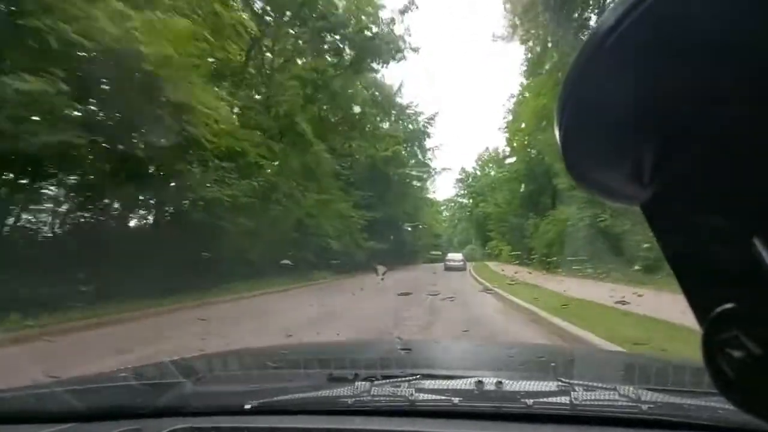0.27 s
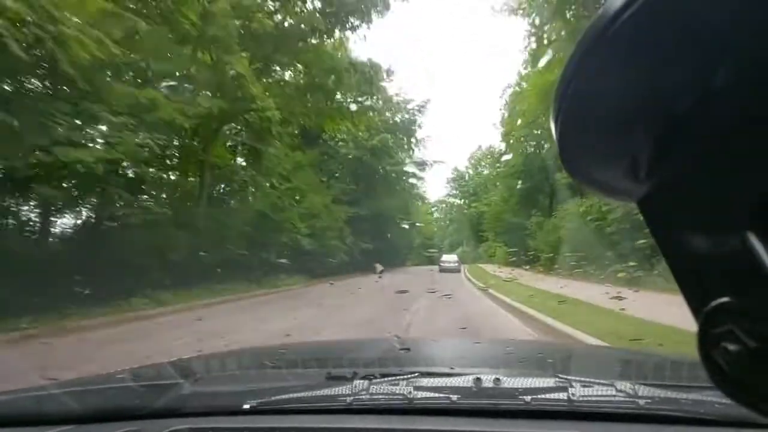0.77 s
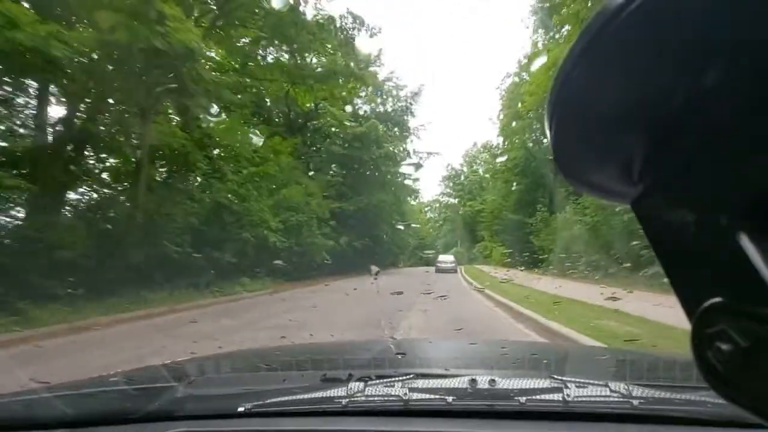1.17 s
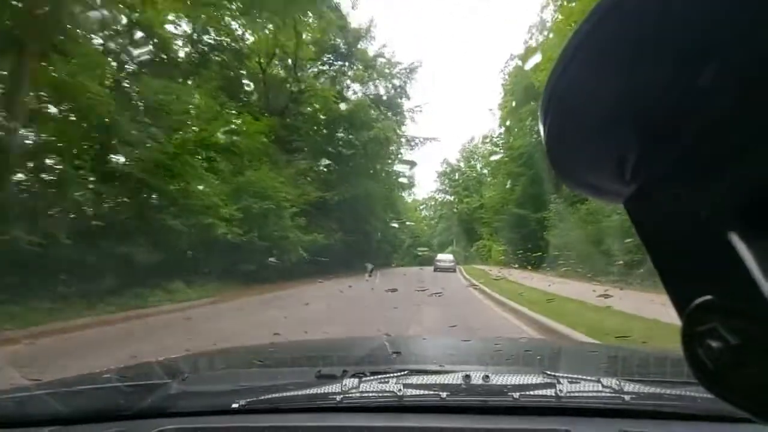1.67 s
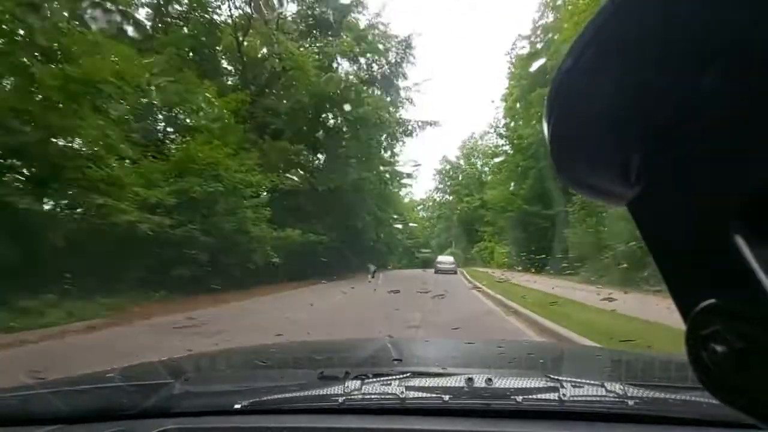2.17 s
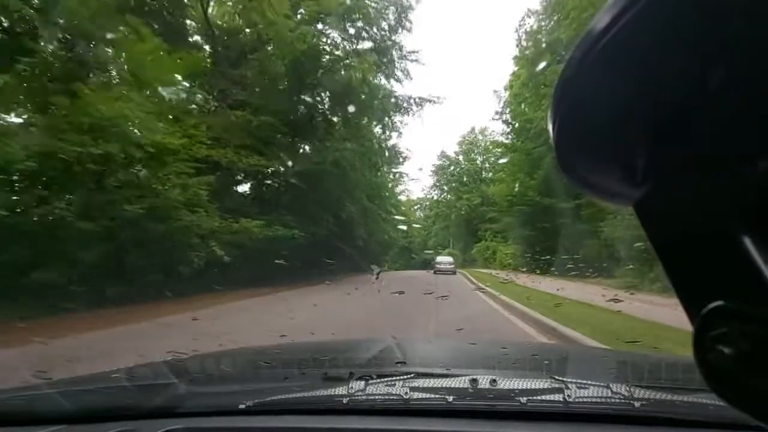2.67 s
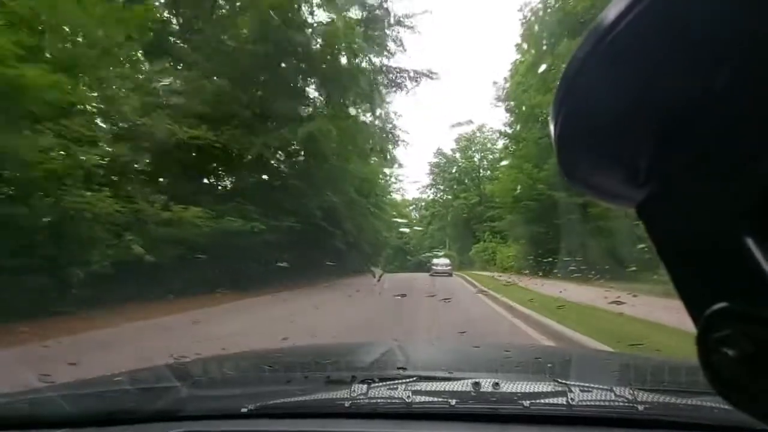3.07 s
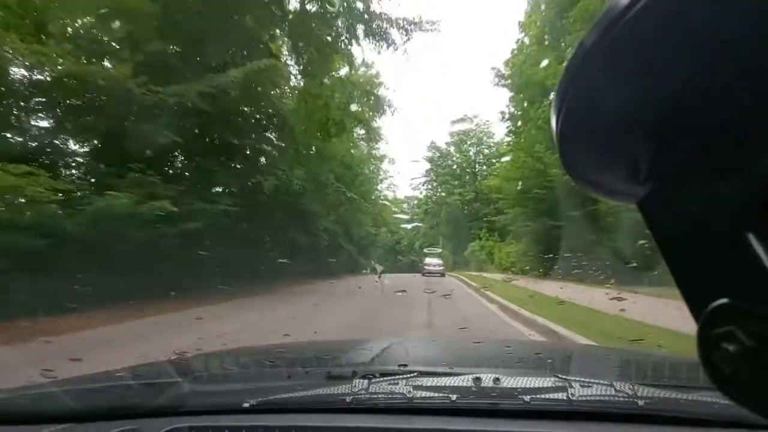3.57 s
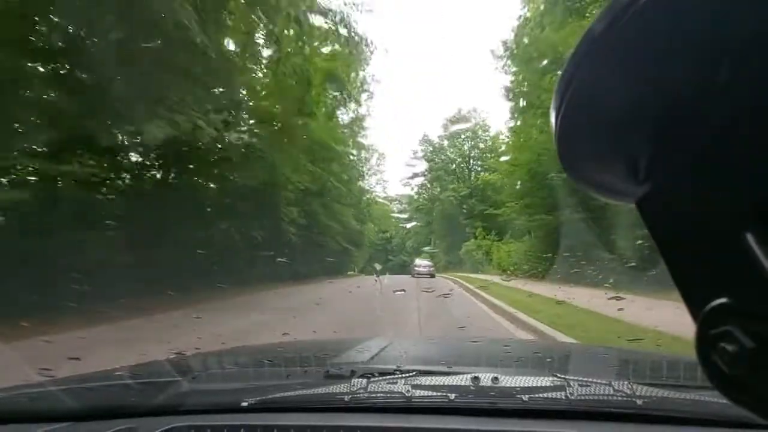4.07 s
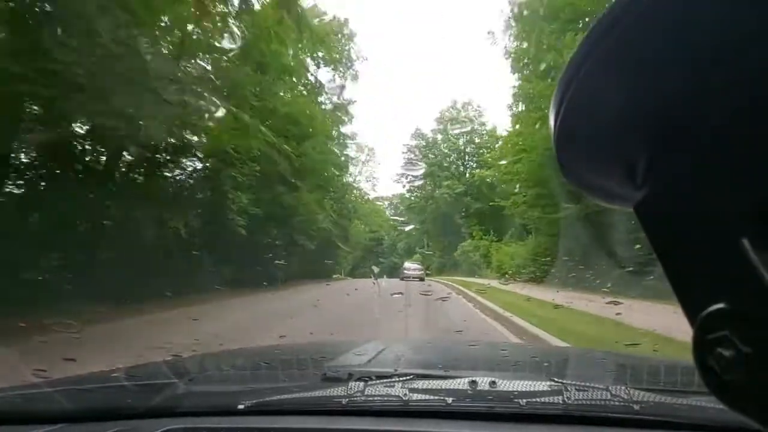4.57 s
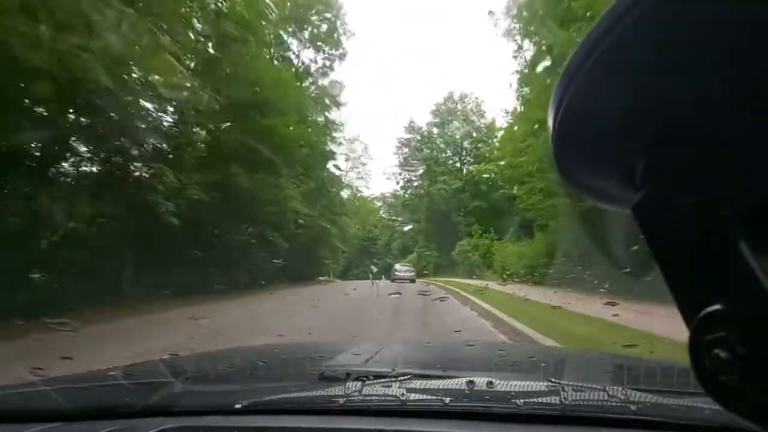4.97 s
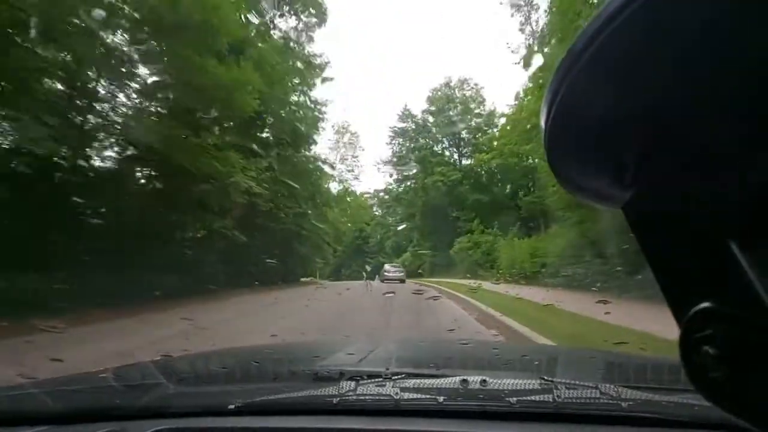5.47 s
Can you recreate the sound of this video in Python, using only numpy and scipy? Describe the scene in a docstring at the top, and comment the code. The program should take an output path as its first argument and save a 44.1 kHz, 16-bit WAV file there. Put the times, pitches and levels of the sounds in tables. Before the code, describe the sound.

Inside a car on a damp road, a low six-cylinder engine and exhaust drone dominates throughout, nearly constant in pitch. It starts strong, eases off from about 0.5 to 1.7 seconds, then pulls again at 2 seconds with a slight growl, holding until it softens a little after 5 seconds. Tyres rumble underneath with a faint wet hiss. Bumps thud through the body around 0.9 and 1.5 seconds, harder at 3 and 3.3 seconds, and again at 5.4, with short knocks from the trim. A loose plastic part buzzes quietly in bursts near the start, mostly between 1.7 and 3.4 seconds, and again after 5. Tiny metal chinks come around 0.5, 1.3, 1.8 and 5.2 seconds. Sparse raindrops tick on the windscreen, slightly to the left, growing more frequent from 3 seconds. Everything sounds close and enclosed.

```python
"""Inside a sports car on a damp road. The V6 exhaust drones near 1800 rpm, eases off and pulls again;
its note is made of the engine's firing pulses. The tyres rumble and hiss, and sparse raindrops tick
on the windscreen. A loose plastic part buzzes in bursts, small metal fittings chink, and bumps thud
through the body and knock the trim. All but the engine is noise, shaped in tone and loudness."""
import sys
import numpy as np
from scipy import signal
from scipy.fft import rfft, irfft, next_fast_len
from scipy.io import wavfile
from scipy.ndimage import map_coordinates

SR = 44100
rng = np.random.default_rng(int(sys.argv[2]) if len(sys.argv) > 2 else 0)


def write(x):
    x = np.atleast_2d(x).T
    wavfile.write(sys.argv[1], SR, np.round(np.clip(x, -1, 1) * 32767).astype(np.int16))


N = 252336

# How alike left and right sound. Each row: pitch in Hz, likeness (1 is the same, 0 is unrelated).
LIKENESS = [(60, .99), (160, .95), (290, .75), (480, .45), (700, 0), (1300, -.2), (2500, .1), (12000, .1)]
# Bumps under the wheels. Each row: start in seconds, suspension heave in dB, body thud in dB.
ROAD_BUMPS = [(.565, -19, -51.5), (.857, -22.5, -41.5), (1.2, -33, -56), (1.55, -22.5, -46.5),
              (1.71, -26.5, -55.5), (2.2, -21.5, -58), (2.83, -16, -57.5), (2.971, -13, -42.5),
              (3.31, -20, -34.5), (5.1, -18.5, -55.5), (5.42, -25.5, -37)]
CABIN_PHASE = 1.3  # radians by which the cabin shifts the firing overtones against the boom


def amp(db):
    """Turn decibels into a number to multiply by."""
    return 10 ** (np.asarray(db) / 20)


def unit(x):
    """Scale a signal to an average (rms) level of 1."""
    return x / np.sqrt(np.mean(x ** 2) + 1e-20)


def along(points, hz):
    """Read between rows of (Hz, value), with octaves evenly spaced."""
    row_hz, values = np.transpose(points)
    return np.interp(np.log(hz + 1), np.log(row_hz + 1), values)


def curves(rows):
    """Give one value per sample for each column after the time."""
    times, *columns = np.transpose(rows)
    return [np.interp(np.arange(N) / SR, times, column) for column in columns]


def wobble(rate):
    """A smooth curve through `rate` random points a second."""
    coarse = np.arange(0, N + 64, 64)
    points = rng.standard_normal(1024)
    return np.interp(np.arange(N), coarse, map_coordinates(points, [coarse * rate / SR], mode="wrap"))


def filtered(x, response):
    """Scale each frequency in x by response(hz)."""
    size = next_fast_len(N + SR // 4)
    return irfft(rfft(x, size) * response(np.fft.rfftfreq(size, 1 / SR)), size)[..., :N]


def cabin_noise(response):
    """Filtered stereo noise at level 1: the bass is in the middle, the treble all around."""
    def weights(hz):
        angle = np.arccos(np.clip(along(LIKENESS, hz), -1, 1)) / 2
        return response(hz) * np.array([np.cos(angle), np.sin(angle)])
    mid, side = filtered(rng.standard_normal((2, N)), weights)
    return unit(np.array([mid + side, mid - side]))


def rush(tone):
    """Cabin noise shaped by rows of (Hz, dB)."""
    return cabin_noise(lambda hz: amp(along(tone, hz)))


def strikes(times, db, attack, t60, tail_db, tail_t60):
    """Loudness of blows: a quick rise, a fall and a weak cabin tail. t60 is seconds to fade 60 dB."""
    t = np.arange(SR // 5) / SR
    fall = amp(-120 * t / t60) + amp(2 * tail_db - 120 * t / tail_t60)  # power, so the dB are doubled
    shape = (1 - np.exp(-t / attack)) ** 2 * fall
    starts = np.clip(np.round(times * SR).astype(int), 0, N - 1)
    power = np.bincount(starts, amp(db) ** 2, N)
    return np.sqrt(np.abs(signal.fftconvolve(power, shape / shape.max())[:N]))


def placed(phase, pan_db, lead):
    """A tone at two spots in the cabin: the left is pan_db louder and `lead` radians ahead."""
    left = amp(pan_db / 2) * np.cos(phase + lead / 2)
    right = amp(-pan_db / 2) * np.cos(phase - lead / 2)
    return np.sqrt(2) * np.array([left, right])


def engine():
    """Six firings a cycle make a boom, with a drone, growl and snarl at 2, 3 and 4 times its pitch."""
    # Engine speed. Each row: time in seconds, firings per second.
    speed = [(0, 94), (.3, 88.6), (.75, 87.5), (1.1, 84), (1.7, 83.2), (2.0, 86.8), (3.0, 88.4),
             (4.0, 89.9), (4.35, 91.3), (4.8, 92.1), (5.25, 91.3), (5.72, 88.7)]
    # Loudness of the boom (set by the throttle), growl and snarl. Each row: time in seconds, level in dB.
    throttle = [(0.04, -10), (0.5, -16), (0.56, -21), (1.27, -27), (1.74, -23), (1.84, -19), (2.06, -14),
                (2.4, -13), (3.16, -15), (4.44, -12), (5.7, -18)]
    growl = [(.24, -47.5), (.42, -36), (1.55, -36.5), (2.03, -24.5), (3.1, -27), (4.1, -29.5), (5.0, -35.5),
             (5.7, -35.5)]
    snarl = [(0, -38), (.17, -39.5), (.8, -54.5), (1.75, -49), (2.2, -39), (3.5, -42.5), (4.4, -51.5),
             (5.0, -60), (5.6, -52.5)]
    # The drone. Each row: time in seconds, level in dB compared with the boom.
    drone = [(.1, -8), (.45, -7), (1.1, -1.5), (2.1, -3), (4.3, -4.5), (5.7, -5)]
    firing_hz, = curves(speed)
    boom_db, = curves(throttle)
    growl_db, = curves(growl)
    snarl_db, = curves(snarl)
    drone_db = boom_db + curves(drone)[0]
    firing = 2 * np.pi * np.cumsum(firing_hz) / SR + .02 * wobble(25)
    cycle = firing / 6
    throb = np.cos(cycle)  # unequal cylinders swell the note once a cycle
    growl_db = growl_db + .42 * throb + .17 * wobble(30)
    out = amp(boom_db) * placed(firing, pan_db=.75, lead=.08)
    out += amp(drone_db + 1.4 * throb) * placed(2 * firing + CABIN_PHASE, pan_db=1.9, lead=.24)
    out += amp(growl_db) * placed(3 * firing + CABIN_PHASE, pan_db=-3.5, lead=-.18)
    out += amp(snarl_db + .95 * wobble(13)) * placed(4 * firing + CABIN_PHASE, pan_db=-1.5, lead=.37)
    load_db = boom_db - boom_db.max()  # more throttle, stronger overtones
    return out + amp(.74 * load_db + 3.5) * exhaust_overtones(cycle, firing_hz / 6)


def exhaust_overtones(cycle, cycle_hz, bank_db=-6, cylinder_db=-11.5, rough_db=1.5, count=72):
    """Unequal cylinders and their two banks add weak tones that swell as they slide past resonances."""
    # Exhaust tone in the cabin. Each row: pitch in Hz, relative level in dB.
    pipe = [(40, -42), (100, -33), (133, -27), (200, -37), (300, -41), (350, -49), (400, -56), (440, -61),
            (560, -63), (640, -59), (760, -66), (1100, -76)]
    # Resonances of pipe and cabin. Each row: pitch in Hz, width in Hz, boost in dB.
    resonances = [(308, 22, 7), (352, 24, 10), (378, 14, 11), (416, 14, 11), (457, 30, 14), (523, 32, 13),
                  (611, 12, 5)]
    grid_hz = np.arange(1500)
    boost_db = sum(db / (1 + (2 * (grid_hz - hz) / width) ** 4) for hz, width, db in resonances)
    passed_db = along(pipe, grid_hz) + boost_db
    out = np.zeros((2, N))
    for k in range(2, count + 1):
        if k in (6, 12, 18, 24):  # engine() makes these four
            continue
        share_db = 0 if k % 6 == 0 else bank_db if k % 3 == 0 else cylinder_db
        hz = k * cycle_hz
        apart = np.sqrt(1 - np.clip(along(LIKENESS, hz.mean()), 0, 1))
        start, pan, lead = rng.standard_normal(3)
        level = amp(np.interp(hz, grid_hz, passed_db) + share_db + rough_db * wobble(13))
        shift = CABIN_PHASE if k % 6 == 0 else np.pi * start
        out += level * placed(k * cycle + shift, pan_db=2 * apart * pan, lead=1.7 * apart * np.sign(lead))
    return out


def road():
    """The suspension rumbles and heaves, body panels boom, and tyres roar and hiss on damp asphalt."""
    # Uneven road between bumps. Each row: time in seconds, rumble in dB.
    unevenness = [(.1, -27.5), (.45, -37), (.65, -29), (1.7, -25.5), (2.0, -32.5), (2.5, -28), (3.15, -36),
                  (3.6, -31), (4.9, -37.5), (5.6, -29.5)]
    # Rolling tyres. Each row: time in seconds, then relative levels of roar and hiss in dB.
    rolling = [(0.08, -54.5, -72), (0.59, -59.5, -73.5), (0.9, -61, -84.5), (1.27, -60.5, -79.5),
               (1.98, -56.5, -74), (2.17, -54.5, -74), (2.62, -57.5, -79), (3.19, -56.5, -72),
               (3.81, -57.5, -74.5), (4.94, -56.5, -77), (5.18, -57.5, -72), (5.64, -57.5, -77)]
    # The tone of each of the four noises. Each row: pitch in Hz, relative level in dB.
    rumble_tone = [(12, -32.5), (24, -14), (38, -9.5), (48, -6.5), (60, 5), (72, -9.5), (90, -9),
                   (200, -33.5), (500, -77.5)]
    body_tone = [(50, -31.5), (90, -7), (125, -0.5), (160, -4.5), (215, -5), (290, -8.5), (345, -11.5),
                 (400, -22.5), (560, -28.5), (900, -66)]
    roar_tone = [(200, -19.5), (450, -1), (760, 0.5), (1000, -9), (1300, -12), (2100, -17), (2800, -22.5),
                 (4000, -23.5), (6000, -37.5), (12000, -51.5)]
    hiss_tone = [(1000, -8.5), (3500, 2.5), (6500, -3.5), (11000, 0), (14000, -3), (16000, -8)]
    rumble_db, = curves(unevenness)
    roar_db, hiss_db = curves(rolling)
    times, heave_db, _ = np.transpose(ROAD_BUMPS)
    surface_db = .7 * wobble(20)
    heave = strikes(times, heave_db, attack=.02, t60=.31, tail_db=-22.5, tail_t60=.3)
    rumble = np.hypot(amp(rumble_db), heave) * rush(rumble_tone)
    body = amp(-30.5 + 1.4 * (roar_db - roar_db.mean()) + surface_db) * rush(body_tone)
    roar = amp(roar_db + 6 + surface_db) * rush(roar_tone)
    hiss = amp(hiss_db + 5.5) * rush(hiss_tone)
    return rumble + body + roar + hiss


def rain(tick_db=-7, splash_db=-2, size_range_db=13, small_splash_db=-12, count=170):
    """Single drops tick on the glass with a bright splash; smaller ones patter between them."""
    # The largest drops. Each row: start in seconds, relative level in dB, treble offset in dB.
    drops = [(0.1425, -38, -16.5), (.9583, -44, -29), (1.042, -45, -15), (1.4631, -42, -12),
             (2.0449, -37, -25), (2.1245, -39, -15), (2.9483, -38, -10), (3.2182, -37, -12),
             (3.5, -39, -17), (3.628, -41.5, -13), (3.7317, -41.5, -15), (3.7988, -36, -12),
             (3.8208, -38, -19), (4.1865, -39, -22.5), (4.3329, -36.5, -10), (4.5358, -42.5, -18.5),
             (4.6151, -46.5, -15.5), (4.7206, -38.5, -10.5), (4.8389, -43, -17), (4.9635, -40.5, -20.5),
             (5.0841, -44, -3), (5.4985, -42.5, -4.5)]
    # The patter grows louder. Each row: time in seconds, level of its bigger drops in dB.
    shower = [(0, -52), (2.4, -51), (3.3, -47.5), (5.7, -48.5)]
    # The tones of struck glass and splashing water. Each row: pitch in Hz, relative level in dB.
    glass_tone = [(800, -24), (1800, -2), (3200, -1), (4200, 0), (5500, -7), (8000, -11), (14000, -23)]
    splash_tone = [(2500, -25.5), (6000, -9), (11000, -3), (15000, -7)]
    times, db, treble_db = np.transpose(drops)
    tick = strikes(times, db + tick_db, attack=.0002, t60=.012, tail_db=-15, tail_t60=.09)
    splash = strikes(times, db + treble_db + splash_db, attack=.0002, t60=.008, tail_db=-18, tail_t60=.05)
    when, size = rng.random((count, 2)).T
    when = when * N / SR
    small_db = np.interp(when, *np.transpose(shower)) - size_range_db * (1 - size ** 2)  # mostly tiny
    patter = strikes(when, small_db, attack=.0002, t60=.011, tail_db=-20, tail_t60=.05)
    glass = np.hypot(tick, patter) * rush(glass_tone)
    water = np.hypot(splash, amp(small_splash_db) * patter) * rush(splash_tone)
    return (glass + water) * amp([[.6], [-.6]])  # a little to the left


def plastic_buzz(shake_s=.0405, contacts_per_s=4000, ring_db=-3.5, chatter_db=-12, chatter_grows=1.35):
    """A loose part shakes in bursts; each shake is a run of tiny contacts that make it ring."""
    # Bursts of shaking. Each row: start in seconds, length in seconds, relative level in dB.
    bursts = [(0.234, .06, -52), (0.423, .14, -50), (0.643, .02, -54), (1.299, .06, -56), (1.751, .06, -49),
              (2.021, .06, -47.5), (2.135, .1, -49.5), (2.244, .1, -42), (2.524, .06, -48.5),
              (2.846, .02, -49), (2.994, .06, -48.5), (3.214, .06, -47), (3.328, .02, -46.5),
              (5.095, .22, -51), (5.597, .1, -50)]
    # The part's resonances. Each row: pitch in Hz, width in Hz, relative level in dB.
    resonances = [(1740, 60, -8), (2055, 60, 0), (2245, 65, -2), (2400, 80, -9), (2590, 80, -8),
                  (3250, 110, -10), (4400, 1400, -19), (7000, 500, -20), (8880, 300, -11), (9710, 250, -11),
                  (11000, 700, -17), (12500, 1100, -15)]
    # The road keeps it trembling between bursts. Each row: time in seconds, level in dB.
    trembling = [(.3, -70.5), (3.3, -69.5), (3.6, -76), (4.9, -74.5), (5.2, -67)]
    shakes = [(start + lag, db - 1 if lag == 0 else db)  # a burst needs one shake to get going
              for start, length, db in bursts for lag in np.arange(0, length, shake_s)]
    times, db = np.transpose(shakes)
    db = db + 1.5 * rng.standard_normal(len(times))
    contacts = unit((rng.random(N) < contacts_per_s / SR) * rng.standard_normal((2, N)))

    def ring(loudness, modes):
        """The contacts follow a loudness curve and set some of the resonances ringing."""
        def response(f):
            return sum((-1) ** k * amp(level) * 1j * f * width / (hz * hz - f * f + 1j * f * width)
                       for k, (hz, width, level) in enumerate(modes))
        return filtered(contacts * loudness, response) / filtered(contacts, response).std()
    high_db = db.mean() + chatter_grows * (db - db.mean()) + chatter_db  # harder shakes are brighter
    low = strikes(times, db + ring_db, attack=.004, t60=.11, tail_db=-20, tail_t60=.18)
    high = strikes(times, high_db, attack=.003, t60=.14, tail_db=-20, tail_t60=.18)
    tremble = amp(curves(trembling)[0] + 4.1 * wobble(25))
    return ring(low + tremble, resonances[:7]) + ring(high, resonances[7:])


def metal_chinks(width=.11):
    """A shaken metal fitting rings briefly around one pitch."""
    # The chinks. Each row: start in seconds, pitch in Hz, level in dB.
    chinks = [(.5, 7300, -59), (1.295, 12000, -60.5), (1.775, 4860, -55), (1.796, 4780, -51.5),
              (5.2, 6600, -58)]
    out = np.zeros((2, N))
    for start, hz, db in chinks:
        band = cabin_noise(lambda f: 1 / (1 + ((f - hz) / (width * hz)) ** 2))
        out += band * strikes(np.array([start]), [db], attack=.0019, t60=.052, tail_db=-9, tail_t60=.15)
    return out


def bumps():
    """Bumps in the road thud through the body, and the trim knocks."""
    # Knocks of the trim. Each row: start in seconds, relative level in dB.
    knocks = [(.6115, -49), (.8674, -49), (0.9216, -42), (1.166, -49), (1.915, -42.5), (2.9741, -35),
              (3.2935, -39), (3.3773, -45), (5.0605, -40), (5.424, -42)]
    # The tones of knocking trim and thudding body. Each row: pitch in Hz, relative level in dB.
    knock_tone = [(300, -30), (700, -5.5), (1100, 0), (1280, -5.5), (1480, 3.5), (1800, -7), (2800, -19.5),
                  (4200, -16), (7000, -37.5), (14000, -34.5)]
    thud_tone = [(80, -12), (200, 3.5), (350, 4.5), (650, -2), (900, -9), (1300, -17), (2500, -41.5)]
    knock_times, knock_db = np.transpose(knocks)
    thud_times, _, thud_db = np.transpose(ROAD_BUMPS)
    knock = strikes(knock_times, knock_db - 3.5, attack=.0026, t60=.065, tail_db=-14.5, tail_t60=.32)
    thud = strikes(thud_times, thud_db, attack=.008, t60=.38, tail_db=-11, tail_t60=.15)
    return knock * rush(knock_tone) + thud * rush(thud_tone)


def scene():
    """Everything as heard behind the windscreen."""
    return engine() + road() + bumps() + plastic_buzz() + metal_chinks() + rain()


def record(dry):
    """Cut away the very highest treble."""
    top_hz = 15800
    return filtered(dry, lambda hz: 1 / (1 + (hz / top_hz) ** 120))


dry = scene()
out = record(dry)
write(out)
```